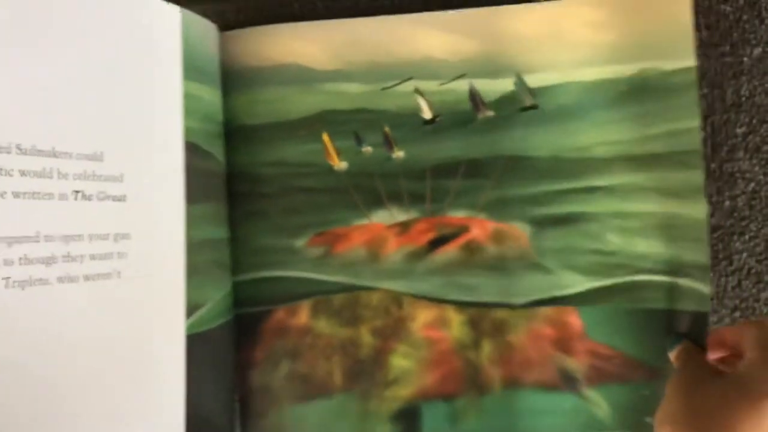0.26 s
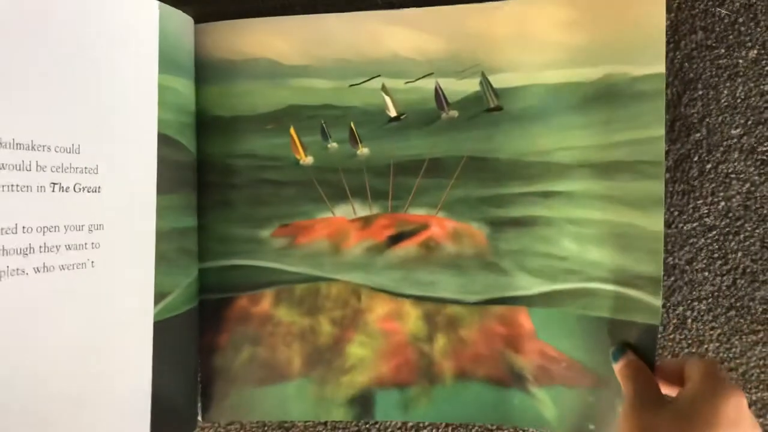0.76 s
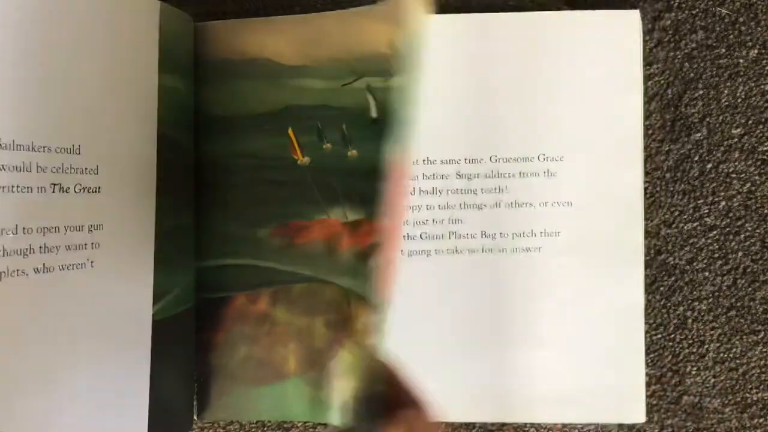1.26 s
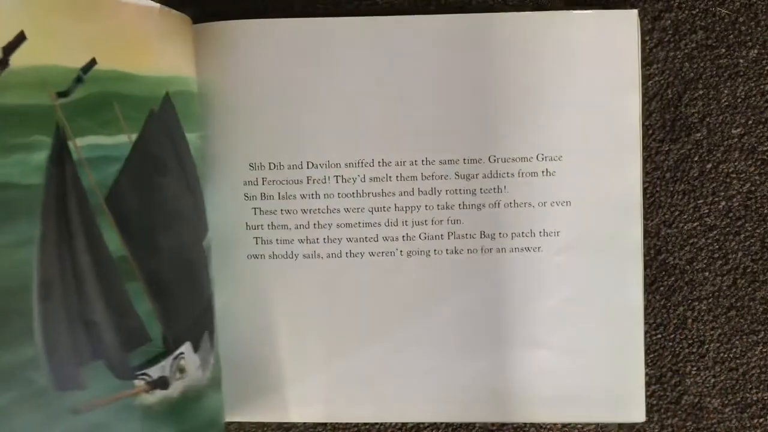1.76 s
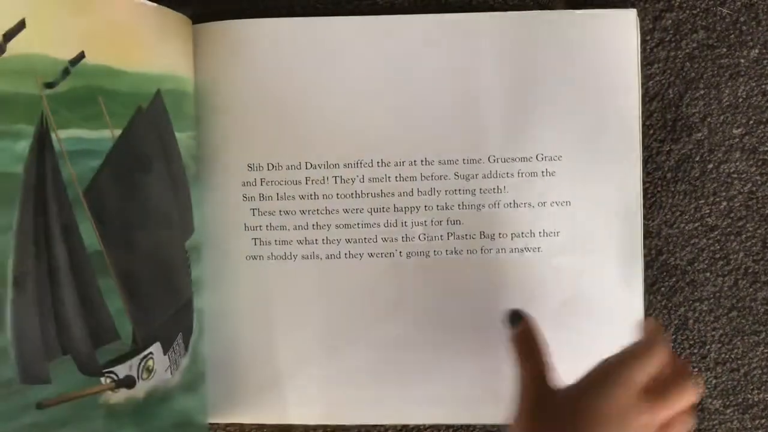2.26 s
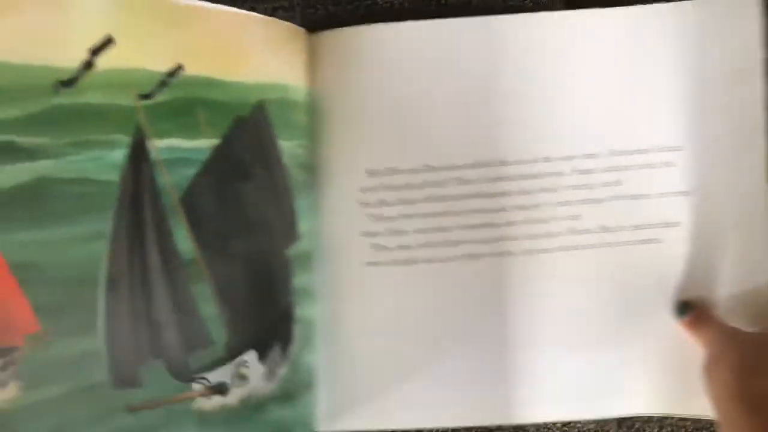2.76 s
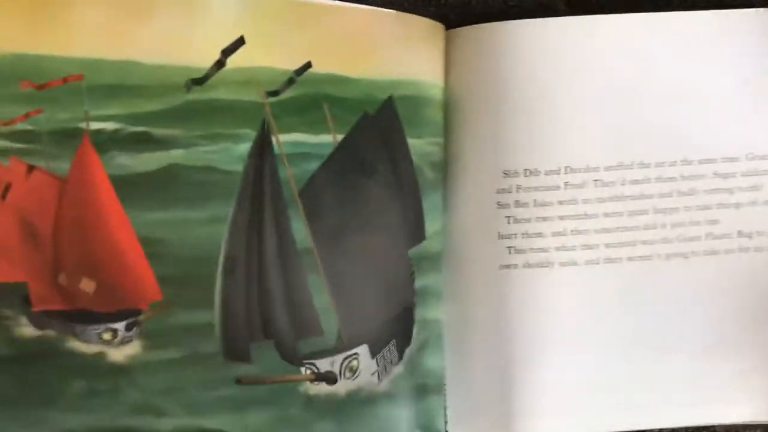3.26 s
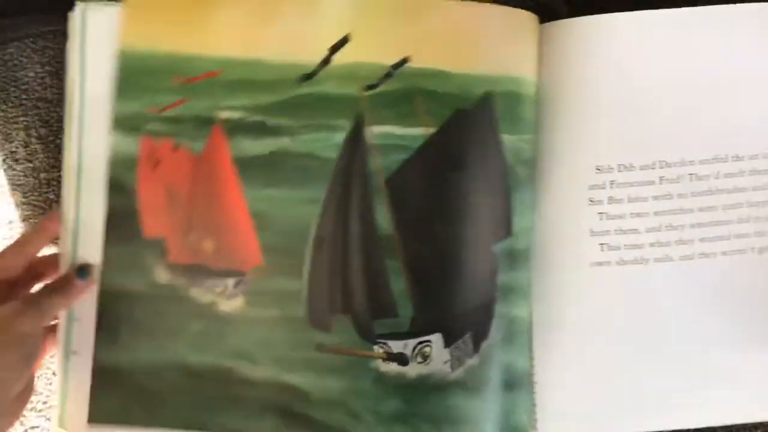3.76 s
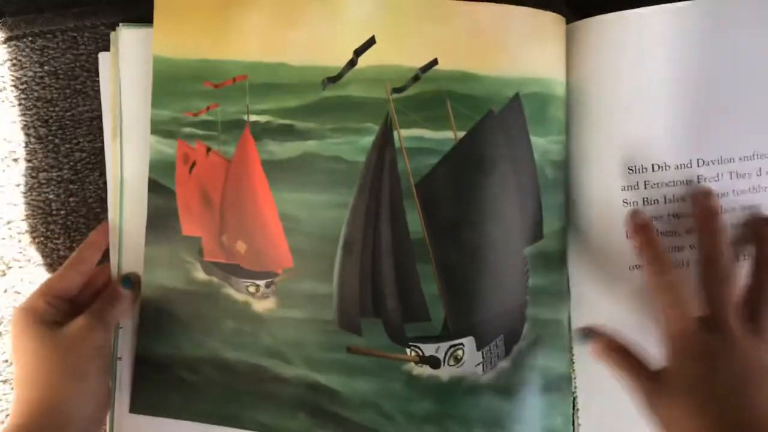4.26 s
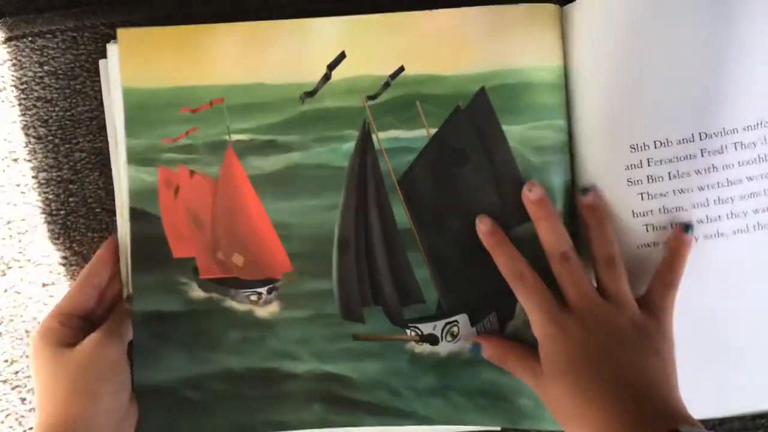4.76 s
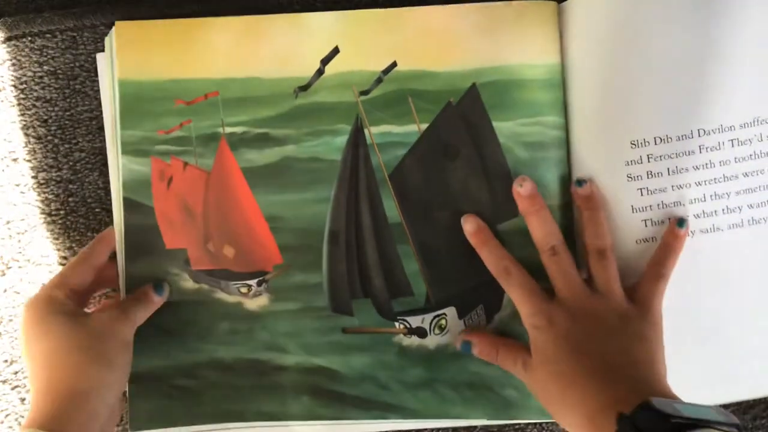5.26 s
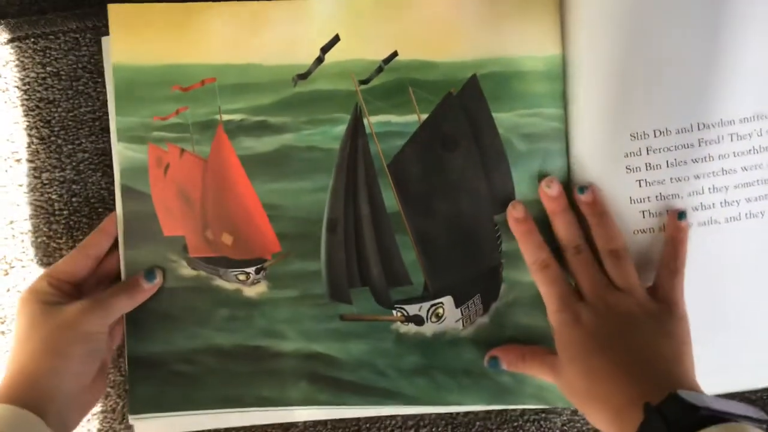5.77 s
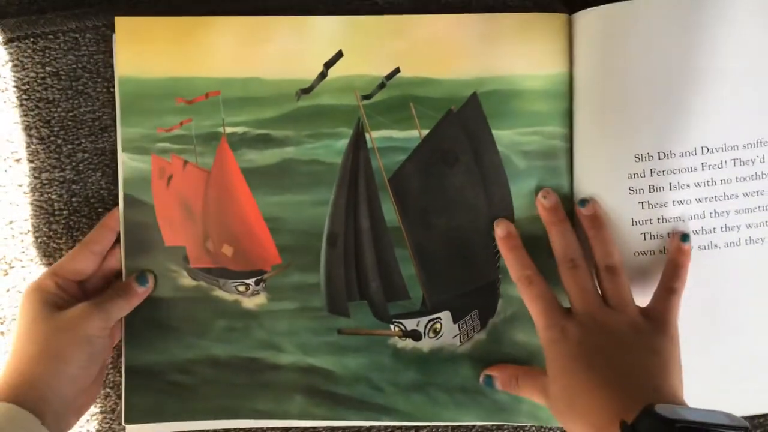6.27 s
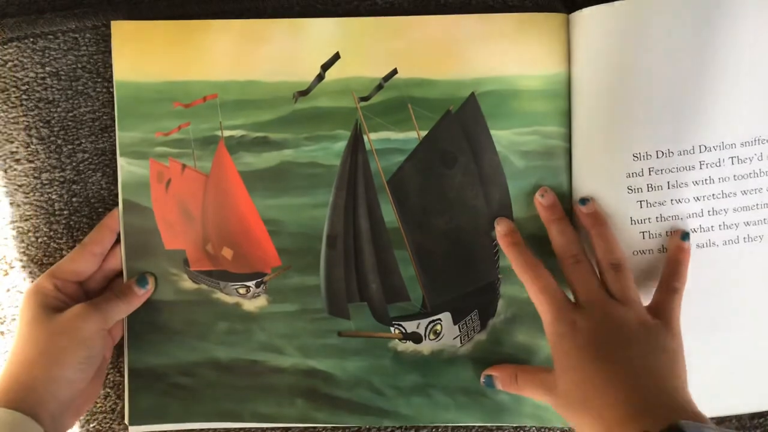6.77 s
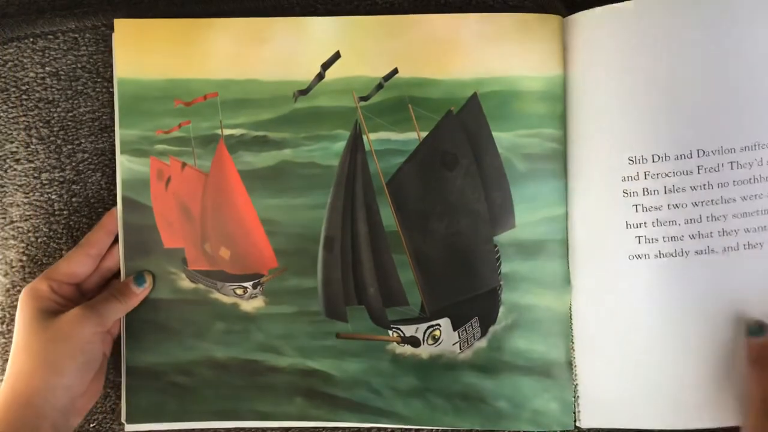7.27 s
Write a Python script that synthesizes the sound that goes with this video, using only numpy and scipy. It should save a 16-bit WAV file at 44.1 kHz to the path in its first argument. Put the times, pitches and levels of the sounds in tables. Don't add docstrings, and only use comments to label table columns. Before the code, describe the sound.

A thumb judders squeakily on a glossy book page, the sheet turns and flops over, then the book drags across carpet and hands pat it flat.

```python
import sys
import numpy as np
from scipy import signal
from scipy.io import wavfile

SR = 44100
rng = np.random.default_rng(int(sys.argv[2]) if len(sys.argv) > 2 else 0)


def voltage_ratio(level):
    return 10 ** (np.asarray(level, float) / 20)


def transcribe(u):
    v = np.clip(np.atleast_2d(u).T, -1, 1)
    q = np.round(v * 32767).astype(np.int16)
    wavfile.write(sys.argv[1], SR, q)


N = 332073


def rms_one(x):
    return x / np.sqrt(np.mean(x ** 2) + 1e-20)


def band(x, low_hz, high_hz):
    sos = signal.butter(2, [low_hz, min(high_hz, .45 * SR)], "band", fs=SR, output="sos")
    return signal.sosfilt(sos, x) * np.sqrt(SR / 2 / (high_hz - low_hz))


def high_pass(x, order, hz):
    return signal.sosfilt(signal.butter(order, hz, "high", fs=SR, output="sos"), x)


def drift(rate_hz):
    r = np.exp(-2 * np.pi * rate_hz / SR)
    wander = signal.lfilter([1], [1, -2 * r, r * r], rng.standard_normal(N + SR))
    return rms_one(wander[SR:])


def ring(clicks, hz, width_hz):
    r, w = np.exp(-np.pi * width_hz / SR), 2 * np.pi * hz / SR
    return signal.lfilter([0, np.sin(w)], [1, -2 * r * np.cos(w), r * r], clicks + 1e-18)


def decay(x, tau_s):
    return signal.lfilter([1], [1, -np.exp(-1 / (tau_s * SR))], x + 1e-18)


def swell(t, start, peak, end, fade_db):
    return -fade_db * np.where(t < peak, (peak - t) / (peak - start), (t - peak) / (end - peak))


def rubbing(spectrum, patchy_db, grain_db, size=N):
    hz, level_db = np.transpose(spectrum)
    white = rng.standard_normal((2, size)) * voltage_ratio(grain_db * drift(250)[:size])
    together, out = drift(12.7), 0
    edges = hz[0] * 2 ** np.arange(0, np.log2(hz[-1] / hz[0]) + 1 / 4, 1 / 4)
    for k, (low, high) in enumerate(zip(edges, edges[1:])):
        here_db = np.interp(np.log(low * high) / 2, np.log(hz), level_db)
        own = np.roll(together, 9001 * (k + 1))
        flicker_db = patchy_db * (together + 2.0 * own)[:size]
        out = out + voltage_ratio(here_db + flicker_db) * np.sqrt(high - low) * band(white[k % 2], low, high)
    return rms_one(out)


def struck(at_s, peak_db, modes, damping, spread_db, tilt_db, tear_s, dulls=0):
    at, out = (np.asarray(at_s) * SR).astype(int), np.zeros(N)
    first, last = max(at.min() - SR // 50, 0), at.max() + SR // 10
    chance = rng.standard_normal((len(at), len(modes)))
    ragged = rng.standard_normal(last - first)
    tilt_db = tilt_db - dulls * (peak_db.max() - peak_db)
    for k, (hz, width_hz, level_db) in enumerate(modes):
        clicks, wide_hz = np.zeros(last - first), damping * (300 + width_hz)
        tilted_db = tilt_db * np.log2(hz / 2000)
        clicks[at - first] = voltage_ratio(peak_db + level_db + spread_db * chance[:, k] + tilted_db)
        creep = decay(clicks[::-1], .0008)[::-1]
        clicks += ragged * (0.08 * decay(clicks, tear_s) + 0.04 * creep)
        out[first:last] += ring(ring(clicks, hz, wide_hz), hz, wide_hz) * wide_hz / SR * 17
    return out


def slips(table, modes, gain_db, damping, tilt_db, tear_s, spread_db, dulls=0):
    s, peak_db = np.transpose(table)
    return voltage_ratio(gain_db) * struck(s - .0004, peak_db, modes, damping, spread_db, tilt_db, tear_s, dulls)


# freq_hz, density_db
HUSH = [(15, -34.5), (25, -12), (53, 2.5), (92, 1.5), (349, -9.5), (1320, -30), (4020, -24), (9330, -34.5),
        (14400, -39.5), (16500, -50)]


def hush():
    return voltage_ratio(-67.5 - 2.5) * rubbing(HUSH, patchy_db=1.4, grain_db=0.7)


def room(x, t60_s):
    t = np.arange(SR // 4) / SR
    tail = band(rng.standard_normal(len(t)), 200, 4200) * voltage_ratio(-60 * t / t60_s) * (t > .004)
    return signal.fftconvolve(x, tail / np.sqrt(np.sum(tail ** 2)))[:N]


# freq_hz, density_db
WEIGHT = [(29, -38.5), (50, -8.5), (92, 3), (162, -0.5), (314, 3.5), (724, -8), (900, -15.5), (1170, -31.5),
          (1980, -120)]
# freq_hz, density_db
LIFTED = [(290, -31.5), (500, -23.5), (949, -8), (1220, -13.5), (1560, 1.5), (2150, 0), (2890, -2.5),
          (3160, -12), (4260, -12), (5080, -9.5), (7000, -25.5), (9100, -53.5), (15400, -120)]
# freq_hz, density_db
PAPER = [(290, -3), (500, 1), (684, -8), (917, 3), (1170, -2), (1420, 0.5), (1790, -1), (3120, -3.5),
         (3520, -5.5), (4860, -3.5), (5600, -15), (7280, -12), (12300, -120)]
# freq_hz, density_db
FIBRES = [(3060, -55.5), (5200, -11.5), (7190, -4.5), (8980, -4), (12200, -6.5), (15100, -3.5),
          (16200, -7.5), (16500, -37)]
# start_s, peak_s, end_s, paper_db, fibre_db
RUBS = [(-.15, 0.07, 0.27, -52, -67), (0.157, 0.264, 0.33, -49, -63.5), (0.34, 0.342, .4, -58, -64),
        (0.4, 0.458, 0.58, -62, -68), (.5, 0.61, 0.643, -54, -72), (0.705, 0.885, .97, -54, -75),
        (1.0, 1.04, 1.1, -68, -84), (1.092, 1.143, 1.178, -47.5, -70), (1.22, 1.261, 1.316, -61, -86)]
# start_s, peak_s, end_s, paper_db, fibre_db
STROKES = [(1.294, 1.403, 1.6, -72, -81), (1.608, 1.9, 2.7, -68, -77.5), (1.92, 1.933, 1.97, -76, -70),
           (2.064, 2.104, 2.177, -57, -72), (2.134, 2.18, 2.274, -56, -68), (2.258, 2.377, 2.46, -60, -67),
           (2.47, 2.517, 2.6004, -51, -66), (3.78, 3.854, 3.92, -51.5, -62), (4.168, 4.358, 4.38, -64, -65),
           (4.35, 4.45, 4.6052, -67, -71), (4.566, 4.678, 4.91, -58.5, -71.5),
           (4.83, 4.96, 5.087, -57.5, -70.5), (5.05, 5.268, 5.365, -68, -81), (5.458, 5.53, 5.82, -65, -69),
           (5.493, 5.742, 5.79, -64, -65.5), (5.885, 6.052, 6.17, -58.5, -65.5),
           (6.195, 6.34, 6.5003, -74.5, -79.5), (6.514, 6.63, 6.7603, -75.5, -81),
           (6.854, 7.004, 7.1, -74, -77), (7.06, 7.15, 7.24, -68, -67), (7.19, 7.303, 7.43, -75.5, -70.5),
           (7.4, 7.527, 7.65, -71, -75)]
# time_s, fibre_db
DRAG = [
    (2.6, -86),
    (2.674, -72),
    (2.799, -56),
    (2.991, -62),
    (3.071, -60),
    (3.465, -63.5),
    (3.784, -60.5),
    (4.172, -60),
    (4.187, -88),
]


def sliding():
    laid_s, pinned_s = 1.32, 2.3
    t = np.arange(0, N + 64, 64) / SR
    drag_db = np.interp(t, *np.transpose(DRAG), left=-200, right=-200)
    paper_gain = voltage_ratio(-60.5 + 0.33 * (drag_db + 61.5)) + voltage_ratio(-93.5)
    fibre_gain = voltage_ratio(drag_db)
    for start, peak, end, paper_db, fibre_db in RUBS + STROKES:
        shape = voltage_ratio(swell(t, start, peak, end, fade_db=14.5))
        paper_gain = np.hypot(paper_gain, voltage_ratio(paper_db) * shape)
        fibre_gain = np.hypot(fibre_gain, voltage_ratio(fibre_db) * shape)
    paper_gain = np.minimum(paper_gain, voltage_ratio(-53.5))
    weight_gain = voltage_ratio(-69) * (paper_gain / voltage_ratio(-69)) ** 0.46
    weight_gain = np.maximum(weight_gain, voltage_ratio(drag_db - 0.5))
    for s, peak_db, _ in THUDS:
        rise_s, slope_db_per_s = .03, 400
        settle_db = peak_db - 15.5 - slope_db_per_s * np.abs(t - s - rise_s)
        weight_gain = np.hypot(weight_gain, voltage_ratio(settle_db) * (t > s) * (s < pinned_s))
    now = np.arange(N) / SR
    weight_gain, paper_gain, fibre_gain = [np.interp(now, t, g) for g in (weight_gain, paper_gain, fibre_gain)]
    weight = rubbing(WEIGHT, patchy_db=1.92, grain_db=2.45)
    laid = int(laid_s * SR)
    lifted_hiss = rubbing(LIFTED, patchy_db=1.1, grain_db=3.0, size=laid)
    laid_hiss = rubbing(PAPER, patchy_db=0.75, grain_db=2.5, size=N - laid)
    fibres = rubbing(FIBRES, patchy_db=0.48, grain_db=1.0)
    return weight_gain * weight + paper_gain * np.append(lifted_hiss, laid_hiss) + fibre_gain * fibres


# (freq_hz, width_hz, level_db)
GLIDES = [
    ((.36, .46, .68, -58), [(1800, 200, -2), (2250, 300, 0), (2800, 250, 0), (3750, 400, -9), (5100, 350, -6), (8750, 500, -14)]),
    ((.72, .83, .9, -56), [(1900, 300, -2), (2600, 500, 0), (3500, 400, -9), (5000, 500, -8), (8300, 800, -18)]),
    ((2.27, 2.36, 2.47, -57), [(1420, 350, 0), (2410, 300, -4), (3110, 300, -2), (4630, 600, -4)]),
    ((4.2, 4.36, 4.378, -60), [(4100, 900, 0), (7030, 700, -7), (10900, 1200, -3), (12800, 900, -7)]),
]


def glides():
    out = np.zeros(N)
    for (start, peak, end, level_db), modes in GLIDES:
        part = slice(int((start - .15) * SR), int((end + .15) * SR))
        t = np.arange(N)[part] / SR
        grain = rng.standard_normal(len(t)) * voltage_ratio(1.5 * drift(200)[part])
        tone = 0
        for hz, width_hz, db in modes:
            wide_hz = 1.5 * width_hz
            tone = tone + voltage_ratio(db) * rms_one(ring(ring(grain, hz, wide_hz), hz, wide_hz))
        out[part] += voltage_ratio(level_db + swell(t, start, peak, end, fade_db=12)) * rms_one(tone)
    return out


# time_s, slip_rate_hz, level_db
SQUEAK = [(1.915, 820, -73), (1.922, 880, -59), (1.935, 930, -60.5), (1.944, 950, -60.5), (1.955, 970, -77)]
SQUEAK_DB = [-1, -7, -2, 2, -13]


def squeak():
    s, hz, level_db = np.transpose(SQUEAK)
    t = np.arange(N) / SR
    unsteady = 1 + .03 * drift(250)
    phase = 2 * np.pi * np.cumsum(np.interp(t, s, hz) * unsteady) / SR
    tone = sum(voltage_ratio(db + 3.0 * drift(80)) * np.sin((k + 1) * phase) for k, db in enumerate(SQUEAK_DB))
    return voltage_ratio(np.interp(t, s, level_db, left=-200, right=-200)) * tone


# peak_s, rise_s, fall_s, level_db, freq_hz
SCUFFS = [
    (2.186, 0.0055, 0.0051, -46.5, 3820),
    (2.797, 0.013, 0.0099, -47.5, 1540),
    (3.845, 0.011, 0.0094, -38.5, 1730),
]


def scuffs():
    out, t = np.zeros(N), np.arange(N) / SR
    rough = rng.standard_normal(N) * voltage_ratio(1.8 * drift(300))
    for s, rise_s, fall_s, level_db, hz in SCUFFS:
        part = slice(int((s - .1) * SR), int((s + .12) * SR))
        late = t[part] - s
        shape = voltage_ratio(level_db) * np.exp(-np.where(late < 0, late / rise_s, late / fall_s) ** 2)
        out[part] += 0.52 * rms_one(ring(rough[part], hz, 220)) * shape
        out[part] += 0.68 * band(shape * rough[part], 230, 3900)
    return out


# freq_hz, width_hz, level_db
TURNED = [(350, 45, -13), (570, 320, -18), (820, 200, 4), (1150, 350, -1.5), (1490, 240, 6.5),
          (2200, 190, -2)]


def flop():
    t = np.arange(N) / SR - 1.6245
    shape = (t > 0) * np.exp(-np.abs(t) / 0.0061) * (1 - np.exp(-np.abs(t) / 0.0026))
    contact = rng.standard_normal(N) * shape
    contact = signal.sosfilt(signal.butter(2, 2600, fs=SR, output="sos"), contact)
    return voltage_ratio(-47.5 - 7) * sum(voltage_ratio(db) * ring(contact, hz, width_hz) for hz, width_hz, db in TURNED)


# start_s, peak_db, freq_hz
THUDS = [(0.345, -48, 313.5), (0.388, -52.5, 290), (0.561, -33, 224), (0.9, -41, 260), (0.958, -35, 204),
         (1.116, -27.5, 209), (1.622, -41.5, 350), (1.753, -49, 296), (2.083, -42.5, 126),
         (2.181, -44, 226), (2.789, -34, 383), (3.505, -46, 350), (3.843, -45, 288), (4.966, -36, 360),
         (5.34, -49, 239.7), (5.461, -48, 245), (5.491, -47.5, 99), (5.581, -41, 507), (6.092, -40.5, 400),
         (7.032, -45.5, 257), (7.085, -41, 249), (7.122, -39, 322)]
# start_s, peak_db, freq_hz
KNOCKS = [
    (1.1185, -28, 500),
    (1.126, -35, 420),
    (4.921, -43, 420),
    (1.121, -33, 105),
    (1.138, -37, 200),
    (1.15, -37, 170),
    (1.169, -36, 290),
    (4.174, -24, 290),
    (5.355, -48, 300),
    (7.133, -43, 330),
]


def landings(table, cycles, puff):
    out, t = np.zeros(N + SR), np.arange(SR // 4) / SR
    air = band(rng.standard_normal(N + SR), 170, 510)
    for s, peak_db, hz in table:
        i = round((s + 0.0034) * SR)
        rise = voltage_ratio(peak_db) * (1 - np.exp(-t / 0.0015))
        swing = voltage_ratio(-60 * t * hz / cycles) * np.sin(2 * np.pi * hz * t)
        out[i:i + len(t)] += rise * (swing + puff * voltage_ratio(-60 * t / 0.1) * air[i:i + len(t)])
    return out[:N]


# start_s, body_db, treble_db, body_hz
SNAPS = [(1.36, -50.5, -76, 2000), (1.416, -47.5, -76.5, 626), (1.669, -40, -62, 860),
         (1.724, -47.5, -58.5, 1740), (1.76, -32, -64, 1390), (1.872, -55, -56.5, 3600),
         (2.083, -35.5, -44.5, 1010), (2.09, -50, -56, 3500), (2.099, -42, -54, 4000),
         (2.105, -42, -57, 1000), (2.111, -39, -58, 850), (2.184, -31, -38, 4000), (2.955, -41, -62, 1300),
         (2.97, -33.5, -70, 880), (3.302, -40, -74, 1400), (3.508, -25.5, -55, 1670),
         (3.553, -44, -63, 775), (3.698, -40, -72, 1000), (3.979, -40, -53, 1080), (4.135, -43, -70, 2100),
         (4.159, -37, -58, 1170), (4.487, -57, -64, 1500), (4.59, -58, -67, 2000),
         (4.656, -48, -60, 3350), (4.957, -36, -72, 600), (4.966, -32.5, -71, 1720), (4.976, -31, -60, 1490),
        (4.992, -37, -68, 1200), (5, -41, -62, 2280), (5.155, -48, -42, 4780), (5.194, -50, -62, 793),
        (5.223, -47, -62, 1000), (5.239, -29.5, -39, 3600), (5.268, -51, -80, 1000),
        (5.343, -49.5, -64, 600), (5.357, -52, -60, 2000), (5.379, -46.5, -64, 600), (5.407, -48, -71, 600),
        (5.456, -41.5, -59, 633), (5.491, -58, -56, 657), (5.813, -42, -60, 3200), (5.587, -52, -54, 3000),
        (5.837, -38, -56, 3000), (5.943, -46, -71.5, 3040), (5.988, -40, -68, 4834),
        (7.009, -39, -49, 3600), (7.036, -37.5, -47, 4360), (7.086, -50, -50.5, 840),
        (7.119, -45.5, -72, 1130), (7.124, -47, -66, 1800), (7.291, -54.5, -64, 720)]


def snaps():
    out, treble, t = np.zeros(N), np.zeros(N), np.arange(SR // 8) / SR
    rise = 1 - np.exp(-(t / 0.0009) ** 2)
    white = rng.standard_normal((2, N))
    for s, body_db, treble_db, hz in SNAPS:
        i = round(s * SR)
        shape = rise * voltage_ratio(body_db - 4.5 - 60 * t / .017)
        burst = shape * white[0, i:i + len(t)]
        body = 0.62 * rms_one(band(burst, 0.55 * hz, 1.4 * hz)) + 0.55 * rms_one(band(burst, 320, 3240))
        out[i:i + len(t)] += np.sqrt(np.mean(shape ** 2)) * body
        treble[i:i + len(t)] += rise * voltage_ratio(treble_db + 5.0 - 60 * t / 0.0096)
    return out + band(treble * white[1], 2800, 14000)


# start_s, peak_db
PALM = [(5.4619, -64.0), (5.47, -60.3), (5.4774, -59.5), (5.4832, -63.6), (5.4882, -57.3), (5.4944, -55.9),
        (5.5001, -53.2), (5.5059, -53.3), (5.5122, -50.1), (5.5172, -47.5), (5.5213, -46.4), (5.53, -45.2),
        (5.5361, -47.4), (5.5477, -43.8), (5.5621, -43.5), (5.5753, -43.3), (5.5885, -42.3),
        (5.5974, -58.2), (5.6031, -43.4), (5.6177, -60.8)]
# freq_hz, width_hz, level_db
SPREAD = [(426, 1100, -23), (950, 260, -2.5), (1500, 280, -5), (2210, 200, -9.5), (2950, 200, -10.5),
          (4200, 290, -14), (5000, 380, -28)]


def palm():
    return slips(PALM, SPREAD, gain_db=4.0, damping=1.5, tilt_db=0.2, tear_s=0.0019, spread_db=0.6)


# start_s, peak_db
PRESS = [(2.4296, -49.8), (2.4406, -48.7), (2.449, -44.2), (2.46, -42.3), (2.4735, -42.9), (2.4821, -40.2),
         (2.4931, -39.3), (2.5026, -35.9), (2.5108, -34.8), (2.5182, -34.9), (2.528, -32.8),
         (2.5387, -34.2), (2.5516, -39.8), (2.5632, -38.8), (2.5711, -54.8), (2.5765, -42.3),
         (2.5897, -46.3), (2.5965, -46.4), (2.6134, -57.3), (2.6186, -51.8), (2.6262, -48.9)]
# start_s, peak_db
NUDGE = [(2.6674, -57), (2.6813, -50), (2.7012, -50), (2.7153, -47.5), (2.7329, -48), (2.7541, -50),
         (2.7769, -48)]
# freq_hz, width_hz, level_db
COVER = [(600, 170, -32), (1080, 120, 0), (1600, 120, 0), (2230, 190, -4.5), (3160, 420, -7.5),
         (4380, 560, -12.5), (4730, 230, -20), (6640, 910, -24.5), (9000, 1299.6, -21),
         (11500, 2000, -24.5)]


def pressing():
    return slips(PRESS + NUDGE, COVER, gain_db=-1.5, damping=1.1, tilt_db=4.5, tear_s=0.0026, spread_db=1.2)


# start_s, peak_db
UNCURL = [(1.0561, -64.1), (1.0606, -53.9), (1.067, -45.4), (1.0763, -33.9), (1.0855, -71.2),
          (1.0885, -65.7), (1.0932, -50.3), (1.0995, -26.8), (1.1068, -53.6), (1.1119, -60.6),
          (1.1158, -28.1), (1.1232, -15.8), (1.1299, -29.1), (1.1405, -31.1), (1.1444, -44.5),
          (1.1476, -31.7), (1.1542, -30.7), (1.1619, -37.3), (1.168, -42.8), (1.1729, -27.0),
          (1.179, -39.7), (1.1824, -47.7), (1.1904, -55.1), (1.1983, -64.7)]
# freq_hz, width_hz, level_db
FLAT = [(700, 250, -5), (1660, 150, 3), (3400, 300, -7.5), (4830, 200, -15), (6140, 200, -19),
        (8230, 500, -20), (9900, 200, -27), (12700, 500, -25)]


def uncurling():
    return slips(UNCURL, FLAT, gain_db=-2.5, damping=1.6, tilt_db=0.1, tear_s=0.0015, spread_db=1.2, dulls=0.15)


# start_s, peak_db
PINCH = [
    (.3547, -21),
    (.3668, -44),
    (.394, -48),
    (.4167, -50),
]
# freq_hz, width_hz, level_db
TAUT = [(1720, 60, 0.5), (2300, 200, -3), (3900, 300, -3), (4700, 300, -1.5), (6450, 100, -15),
        (7500, 300, -14), (8750, 300, -13), (10500, 300, -25), (13500, 600, -28)]


def pinching():
    clicks = slips(PINCH, TAUT, gain_db=-2.5, damping=1.7, tilt_db=0.1, tear_s=0.0012, spread_db=0.6)
    return high_pass(clicks, 8, 1480)


# start_s, peak_s, end_s, peak_db, gap_ms
CREEP = [(.567, .575, .59, -49, 7.9)]


def creeping():
    rows = []
    for start, peak, end, peak_db, gap_ms in CREEP:
        gap_chance, size_chance = rng.standard_normal((2, 40))
        gap_s = gap_ms / 1000
        s = start + np.cumsum(gap_s * np.exp(0.076 * gap_chance)) - gap_s
        level_db = peak_db + swell(s, start, peak, end, fade_db=9.5) + 1.3 * size_chance
        rows += [row for row in zip(s, level_db) if row[0] <= end]
    return rows


# start_s, peak_db, rebound_db
SLIPS = [(.5512, -44, -70), (.5989, -41.5, -44), (.626, -36, -40), (.6498, -33, -44), (.6735, -31, -39),
         (.6954, -31.5, -40), (.7283, -60, -41), (.7477, -42, -70), (.9643, -24.5, -27.5),
         (.9898, -41, -70), (.9999, -39, -70), (1.027, -52, -70), (1.043, -51, -60)]
# start_s, peak_db
CLIMB = [(0.7613, -48.6), (0.7684, -46.2), (0.7739, -43.5), (0.7789, -48.8), (0.7834, -47.4),
         (0.7906, -49.3), (0.7951, -52.8), (0.8014, -48.7), (0.8071, -49.4), (0.8174, -46.5),
         (0.8218, -44.1), (0.8294, -46.9), (0.8343, -44.2), (0.838, -39.3), (0.8418, -39.7),
         (0.8458, -39.8), (0.85, -39.2), (0.8534, -36.8), (0.8592, -39.6), (0.8682, -32.9), (0.8738, -37.3),
         (0.8799, -27.5), (0.8847, -37.2), (0.8899, -34.3), (0.8958, -33.7), (0.9008, -38.2),
         (0.9045, -27.9), (0.9117, -54.3), (0.9156, -39.5), (0.9231, -38.3), (0.9305, -41.7),
         (0.9361, -49.9), (0.94, -41.1), (0.9434, -35.0), (0.9525, -41.7)]
# freq_hz, width_hz, level_db
SHEET = [(915, 510, -10), (1800, 90, 1.5), (3650, 310, -6), (4900, 320, -7.5), (6840, 85, -19.5),
         (8170, 620, -15.5), (11500, 500, -21), (2650, 200, -5)]


def lifting():
    rebound_s = .0044
    rows = [(s, db) for s, db, _ in SLIPS]
    rows += [(s + rebound_s, db) for s, _, db in SLIPS]
    rows += creeping() + [(s, db + 1.5) for s, db in CLIMB]
    return slips(rows, SHEET, gain_db=-2.0, damping=1.96, tilt_db=0.9, tear_s=0.0018, spread_db=0.6, dulls=0.03)


# start_s, length_s, peak_db
JUDDERS = [(.0, .04, -42), (.04, 0.0048, -26), (0.052, 0.0098, -29.5), (0.072, 0.016, -26.5),
           (0.091, .002, -29), (.1, .017, -22), (.121, .003, -36), (.13, .016, -20.5), (.152, .003, -38),
           (0.169, .01, -20.5), (0.193, .013, -21), (.2165, .018, -22), (0.2364, .008, -23.5),
           (0.252, .02, -24), (0.279, .005, -32), (.286, 0.012, -29), (0.304, 0.021, -37)]
# freq_hz, width_hz, level_db
CORNER = [(940, 1300, -36), (1974, 48, -0.5), (2323, 96, -1), (2700, 79, -5.5), (4150, 45, -20.5),
          (4620, 540, -11.5), (8200, 1700, -23), (11300, 200, -38.5)]


def thumb():
    at_s, level_db = [], []
    for s, length_s, peak_db in JUDDERS:
        first_ms, last_ms = 1.1 + 3.0 * s, 2.3
        t = 0.
        for gap_chance, size_chance in rng.standard_normal((60, 2)):
            if t > length_s:
                break
            at_s.append(s + t)
            level_db.append(peak_db + 1.4 * size_chance)
            gap_ms = max(first_ms + (last_ms - first_ms) * t / length_s, .3)
            t += gap_ms / 1000 * np.exp(.12 * gap_chance)
    level_db = np.array(level_db)
    return voltage_ratio(-12) * struck(at_s, level_db, CORNER, damping=1.66, spread_db=2.0, tilt_db=4.5, tear_s=0.00055)


def scene():
    steady = hush() + sliding() + glides()
    steady = signal.sosfilt(signal.ellip(10, .5, 50, 15750, fs=SR, output="sos"), steady)
    curled = signal.lfilter(*signal.iirnotch(1270, 3.0, fs=SR), thumb() + lifting())
    sheet = high_pass(curled + uncurling(), 2, 400)
    hits = sheet + pinching() + pressing() + palm() + snaps() + scuffs() + flop() + squeak()
    hits = hits + landings(THUDS, cycles=8.5, puff=0.24) + landings(KNOCKS, cycles=4.5, puff=0.06)
    return (hits + voltage_ratio(-32.5) * room(hits, t60_s=0.053) + steady)[None]


def low_pass(x):
    return signal.sosfilt(signal.butter(12, 16760, fs=SR, output="sos"), x)


def record(dry):
    mic = high_pass(dry, 4, 48)
    return low_pass(mic)


dry = scene()
out = record(dry)
transcribe(out)
```